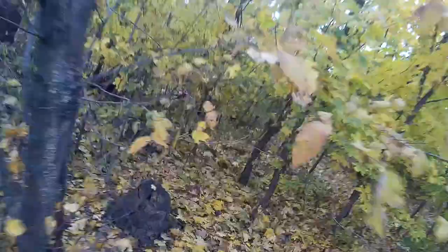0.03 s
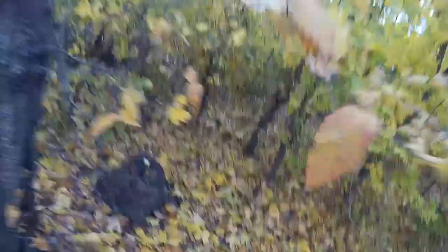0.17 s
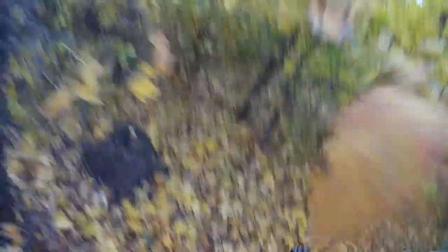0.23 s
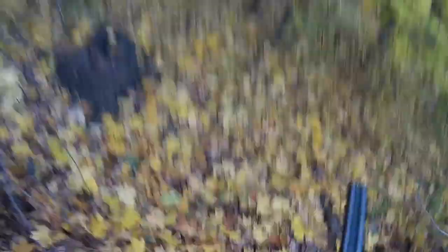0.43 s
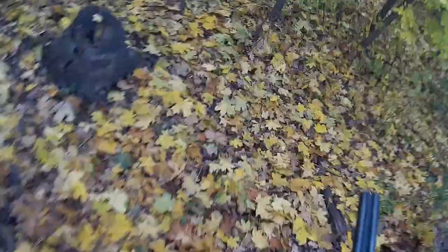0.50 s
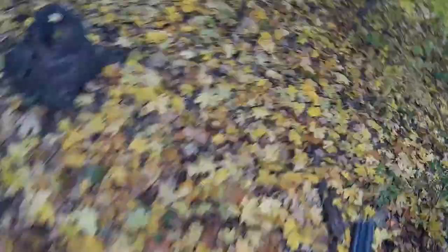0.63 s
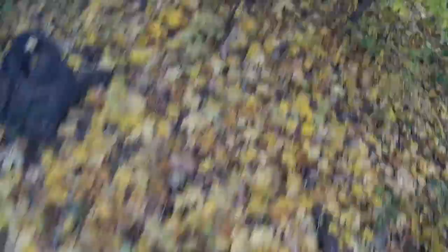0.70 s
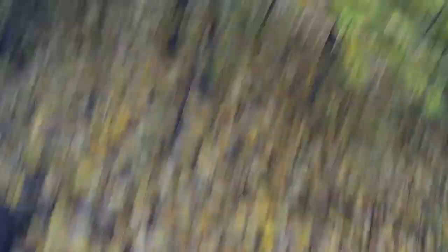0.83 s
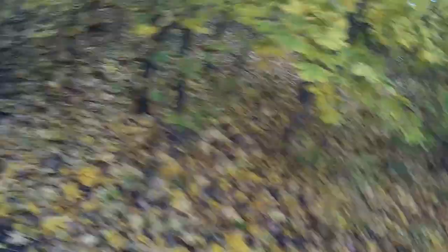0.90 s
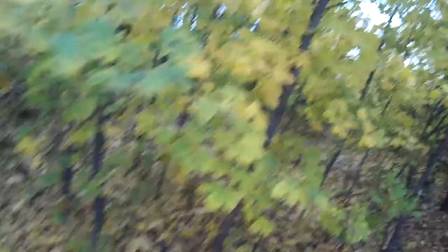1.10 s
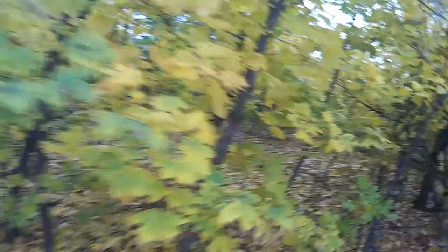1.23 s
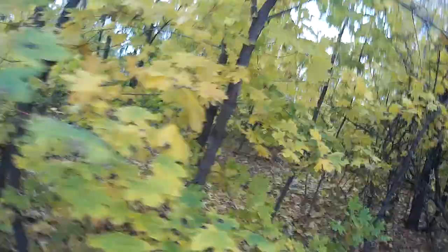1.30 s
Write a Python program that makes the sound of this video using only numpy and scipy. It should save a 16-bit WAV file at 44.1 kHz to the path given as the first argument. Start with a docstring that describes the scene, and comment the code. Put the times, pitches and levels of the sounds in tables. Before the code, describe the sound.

Gear is handled right at the microphone in a wood: a catch clicks, a part scrapes briefly and knocks home hard. Soft ticks and a small rattle follow, over faint wind rumble and rustling leaves.

```python
"""A piece of gear is handled right at a moving camera in an autumn wood.
Its catch clicks, a part scrapes along and knocks home on the hollow body, overloading the microphone;
later come a soft tick and a small rattle. Each contact is a crack of noise plus damped ringing,
scattered faintly by the trunks. Air rumbles on the microphone over a distant rush, a thin hiss
and a faint rustle of leaves."""
import sys
import numpy as np
from scipy import signal
from scipy.fft import rfft, irfft
from scipy.io import wavfile

SR = 44100
rng = np.random.default_rng(int(sys.argv[2]) if len(sys.argv) > 2 else 0)


def bounce(signal):
    """Save signal as a 16-bit WAV file at the path given by the first command-line argument."""
    frames = np.transpose(np.atleast_2d(signal))
    limited = np.clip(frames, -1, 1)
    pcm = np.round(limited * 32767).astype(np.int16)
    wavfile.write(sys.argv[1], SR, pcm)


N = 59535


def amp(db):
    """Decibels to gain."""
    return 10 ** (np.asarray(db) / 20)


def unit(x):
    """Scales to rms 1."""
    return x / np.sqrt(np.mean(x ** 2) + 1e-20)


def decay(t, t60_s):
    """Exponential fall, 60 dB in t60_s."""
    return np.exp(-np.log(1000) * t / t60_s)


def add(mix, start_s, sound):
    """Lays a sound into the mix."""
    part = mix[max(round(start_s * SR), 0):][:len(sound)]
    part += sound[:len(part)]


def shaped(x, spectrum):
    """Filters x by (frequency [Hz], gain [dB]) points, to rms 1."""
    hz, db = np.transpose(spectrum)
    bins_hz = np.fft.rfftfreq(len(x), 1 / SR)
    gain = amp(np.interp(np.log(bins_hz + 1), np.log(hz), db))
    return unit(irfft(rfft(x) * gain, len(x)))


def noise(spectrum, samples=N):
    """Shaped Gaussian noise, rms 1."""
    return shaped(rng.standard_normal(samples), spectrum)


def level(curve, outside_db=None):
    """Gain over time from (time [s], level [dB]) points."""
    times_s, db = np.transpose(curve)
    return amp(np.interp(np.arange(N) / SR, times_s, db, outside_db, outside_db))


# hiss spectrum (frequency [Hz], gain [dB])
HISS_SPECTRUM = [(1000, -2.5), (4000, 0.5), (9000, -0.5), (14500, -4), (16000, -20)]
def microphone_hiss(level_db=-69.5):
    """Thin, constant self-noise."""
    return noise(HISS_SPECTRUM) * amp(level_db)


# rush spectrum (frequency [Hz], gain [dB])
RUSH_SPECTRUM = [(60, -12.5), (160, -22.5), (260, -15), (430, -11), (580, 0), (740, 1.5), (900, -7),
                 (1150, -22), (2000, -28.5), (3000, -39), (5000, -43), (9000, -51), (16000, -70)]
# rush envelope (time [s], level [dB])
RUSH_ENVELOPE = [(0, -48), (.3, -45), (.43, -49), (.55, -44), (.63, -46), (.83, -48), (.98, -51.5),
                 (1.15, -45.5), (1.35, -52)]
def distant_rush():
    """Unbroken midrange noise, wavering by a few dB."""
    return noise(RUSH_SPECTRUM) * level(RUSH_ENVELOPE)


# wind spectrum (frequency [Hz], gain [dB])
WIND_SPECTRUM = [(15, -13.5), (28, -5), (50, -4.5), (80, -2.5), (120, -4), (160, -8), (210, -9), (320, -15),
                 (600, -21), (1500, -52.5), (4000, -64)]
# gust envelope (time [s], relative level [dB])
GUST_ENVELOPE = [(0.0, -45), (0.198, -43), (0.218, -45), (0.254, -40), (0.296, -39.5), (0.406, -56),
                 (0.518, -59.5), (0.63, -55.5), (0.68, -40.5), (0.758, -39), (0.804, -54), (0.902, -53.5),
                 (0.958, -57), (0.996, -54.5), (1.09, -50.5), (1.112, -48), (1.326, -47.5), (1.35, -51)]
def wind(gain_db=1.5):
    """Air buffets the microphone in low gusts."""
    return noise(WIND_SPECTRUM) * level(GUST_ENVELOPE) * amp(gain_db)


def friction(slips_per_s=1000, spread_db=2.5):
    """Dense tiny slips of uneven size over a smooth rub."""
    sizes = amp(spread_db * np.minimum(rng.exponential(1, N), 4))
    signs = rng.choice([-1, 1], N)
    slipping = rng.random(N) < slips_per_s / SR
    return unit(sizes * signs * slipping) + rng.standard_normal(N)


# rustle spectrum (frequency [Hz], gain [dB])
RUSTLE_SPECTRUM = [(150, 7), (350, -6.5), (1100, -1.5), (1600, -11), (2300, -14.5), (4000, -33),
                   (8000, -36), (15000, -50)]
# Gaussian swells (centre [s], sigma [s], level [dB])
RUSTLE_SWELLS = [(0.008, 0.013, -53), (0.72, 0.025, -52), (0.882, 0.06, -54.5), (1.3, 0.08, -61)]
def rustle():
    """Leaves and clothing rub in soft swells."""
    t = np.arange(N) / SR
    swells = sum(amp(db) * np.exp(-.5 * ((t - centre_s) / sigma_s) ** 2)
                 for centre_s, sigma_s, db in RUSTLE_SWELLS)
    return shaped(friction(), RUSTLE_SPECTRUM) * swells


# scatter spectrum (frequency [Hz], gain [dB])
SCATTER_SPECTRUM = [(100, -16.5), (400, 4), (2000, -4.5), (4300, 1.5), (7000, -8), (15000, -18)]
def trunk_scatter(x, gain_db=-44.5, t60_s=.45):
    """The trees return a faint, short, diffuse tail."""
    t = np.arange(SR // 2) / SR
    tail = noise(SCATTER_SPECTRUM, len(t)) * decay(t, t60_s)
    return amp(gain_db) * signal.fftconvolve(x, tail / np.linalg.norm(tail))[:N]


# scrape spectrum (frequency [Hz], gain [dB])
SCRAPE_SPECTRUM = [(120, -15.5), (330, 7.5), (700, 6.5), (1200, -1), (2100, -2.5), (3000, -19),
                   (4500, -21.5), (5700, -41.5), (8500, -36), (15000, -55)]
# slide around the knock (time [s], level [dB])
SLIDE_ENVELOPE = [(.229, -56), (.236, -26.5), (.252, -32.5), (.272, -43), (.284, -28), (.298, -29.5),
                  (.318, -38), (.335, -47.5), (.39, -58), (.43, -75)]
# slide in the later rattle (time [s], level [dB])
RATTLE_ENVELOPE = [(1.105, -68), (1.128, -44), (1.14, -41.5), (1.168, -45), (1.185, -58), (1.22, -62.5)]
def sliding():
    """One part scrapes over another, twice."""
    envelope = level(SLIDE_ENVELOPE, -np.inf) + level(RATTLE_ENVELOPE, -np.inf)
    return shaped(friction(), SCRAPE_SPECTRUM) * envelope


# tap noise spectrum (frequency [Hz], gain [dB])
TAP_SPECTRUM = [(100, -3), (400, 2), (1100, 0), (2300, -4), (3300, -14.5), (4500, -10), (6000, -29),
                (9000, -19), (15000, -45)]
# light taps (time [s], level [dB], pitch [Hz], t60 [s], relative noise [dB], noise cutoff [Hz])
LIGHT_TAPS = [(.008, -25.5, 1703, 0.0049, -19, 2580), (0.2408, -16, 370, 0.024, -4, 4960),
              (0.366, -34, 395, 0.027, -2, 3000), (0.6114, -35.5, 1770, 0.034, -34, 1800),
              (.6125, -28, 728, 0.032, -6, 1200), (.628, -28, 630, .016, -6.5, 1320),
              (0.63, -38, 317, 0.052, -11, 700), (.704, -41, 1110, 0.036, -12, 1400),
              (0.909, -39, 520, 0.027, -2, 1780), (1.027, -47, 1420, 0.013, 3, 2260),
              (1.1293, -20, 686, 0.02, -7, 8000), (1.1336, -18.5, 415, 0.015, -15, 2500),
              (1.1497, -24, 690, 0.016, -5, 6040), (1.1617, -18.5, 830, 0.02, -15.5, 6140),
              (1.312, -34.5, 724, 0.026, -14, 1510)]
def taps(rise_s=.00037, noise_t60_s=.011):
    """A hand damps the gear, so each tap is a crack with one short tone."""
    out, t = np.zeros(N), np.arange(4096) / SR
    for start_s, db, hz, t60_s, noise_db, cutoff_hz in LIGHT_TAPS:
        tone = np.sin(2 * np.pi * hz * t) * decay(t, t60_s)
        crack = noise(TAP_SPECTRUM, len(t)) * decay(t, noise_t60_s)
        crack = signal.lfilter(*signal.butter(2, cutoff_hz, fs=SR), crack)
        attack = 1 - np.exp(-t / rise_s)
        add(out, start_s, amp(db) * (tone + amp(noise_db) * crack) * attack)
    return out


def coloured(x, centre_hz, width_octaves, depth_db=20.5):
    """Broad emphasis set by where and how hard a part is struck."""
    bins_hz = abs(np.fft.fftfreq(len(x), 1 / SR)) + 1
    bell = np.exp(-.5 * (np.log2(bins_hz / centre_hz) / width_octaves) ** 2)
    log_gain = np.log(amp(depth_db * (bell - 1)))
    minimum_phase = np.exp(np.conj(signal.hilbert(log_gain)))
    return np.fft.ifft(np.fft.fft(x) * minimum_phase).real


# contact noise spectrum (frequency [Hz], gain [dB])
CRACK_SPECTRUM = [(200, -8.5), (600, 7), (2000, -5), (3500, -9.5), (5500, -14), (8500, -24), (12000, -25.5),
                  (16000, -42)]
def strikes(contacts, modes, noise_t60_s, noise_db=-7, rise_s=.00036):
    """Each contact is a crack of noise plus the part's damped modes, in alternating polarity."""
    out, t = np.zeros(N), np.arange(8192) / SR
    ring = sum((-1) ** k * amp(db) * decay(t, t60_s) * np.sin(2 * np.pi * hz * t)
               for k, (hz, db, t60_s) in enumerate(modes))
    attack = 1 - np.exp(-t / rise_s)
    for start_s, db, centre_hz, width_octaves in contacts:
        crack = noise(CRACK_SPECTRUM, len(t)) * amp(noise_db) * decay(t, noise_t60_s)
        add(out, start_s, amp(db) * coloured((ring + crack) * attack, centre_hz, width_octaves))
    return out


# catch modes (frequency [Hz], relative level [dB], t60 [s])
CATCH_MODES = [(1200, 1.5, .019), (1540, -8, .03), (1942, -12.5, 0.048), (2860, 2.5, 0.01),
               (3204, -1, .016), (3844, -24, 0.054), (4405, -26, 0.037), (6130, -16.5, 0.0074),
               (8250, -25, 0.018), (10400, -22, .006), (12200, -23.5, .005)]
# clicks (time [s], gain [dB], colour centre [Hz], colour width [octaves])
CATCH_CLICKS = [(.2295, -10, 2000, 6.3), (.2348, -13.5, 8000, 0.96), (.2404, -20.5, 7590, .9)]
def catch_clicks():
    """The catch snaps in three quick, bright contacts."""
    return strikes(CATCH_CLICKS, CATCH_MODES, noise_t60_s=.019)


# body modes (frequency [Hz], relative level [dB], t60 [s])
BODY_MODES = [(292.2, -3.5, 0.038), (556.4, 5, .016), (667, -1.5, 0.037), (857.5, -4, 0.0367),
              (1181, 0, 0.028), (1565, -13, .024), (1906, 4.5, 0.013), (2256, -6, 0.017), (2803, -2, .01),
              (3398, -16.5, 0.012), (4380, -19, 0.014), (5050, -19, .009)]
# knocks (time [s], gain [dB], colour centre [Hz], colour width [octaves])
BODY_KNOCKS = [(.2905, -25.5, 2150, 1.2), (.2962, -17.5, 1310, 2), (.2999, -2, 1100, 10)]
def body_knocks():
    """The part knocks home: two light contacts and a hard one ring the hollow body."""
    return strikes(BODY_KNOCKS, BODY_MODES, noise_t60_s=.0067)


def scene():
    """The gear close by, the wood around it; mono."""
    gear = catch_clicks() + body_knocks() + taps() + sliding()
    return (gear + trunk_scatter(gear) + rustle() + wind() + distant_rush() + microphone_hiss())[None]


# microphone treble roll-off (frequency [Hz], gain [dB])
MICROPHONE_RESPONSE = [(20, 0), (6000, -2.5), (10000, -3), (14000, -3), (16000, -12)]
def record(dry, ceiling=.99, band_limit_hz=16200):
    """The loudest knock clips; treble roll-off and band limit follow."""
    clipped = np.clip(dry, -ceiling, ceiling)
    hz, db = np.transpose(MICROPHONE_RESPONSE)
    response = amp(np.interp(np.fft.rfftfreq(N, 1 / SR), hz, db))
    rolled_off = irfft(rfft(clipped) * response, N)
    low_pass = signal.firwin(255, band_limit_hz, window=("kaiser", 9), fs=SR)
    return signal.oaconvolve(rolled_off, low_pass[None], "same")


dry = scene()
out = record(dry)
bounce(out)
```